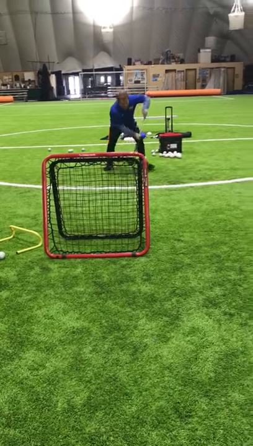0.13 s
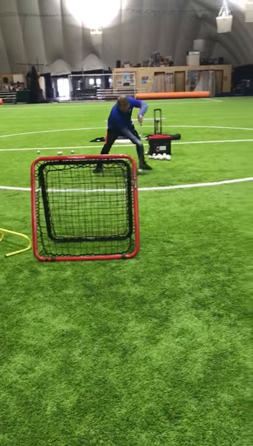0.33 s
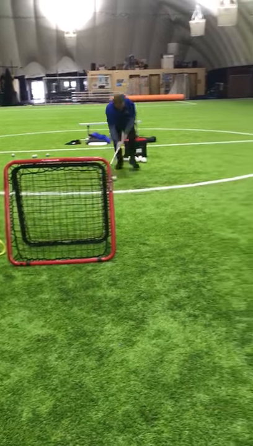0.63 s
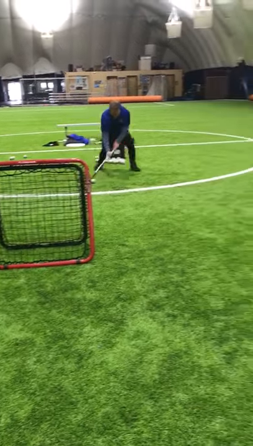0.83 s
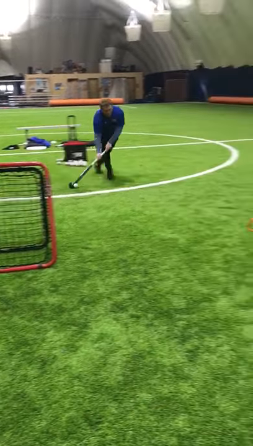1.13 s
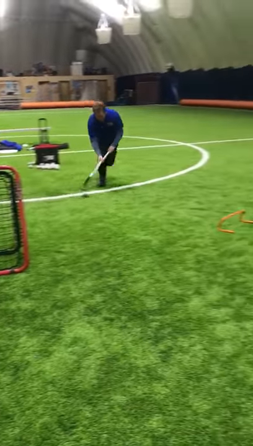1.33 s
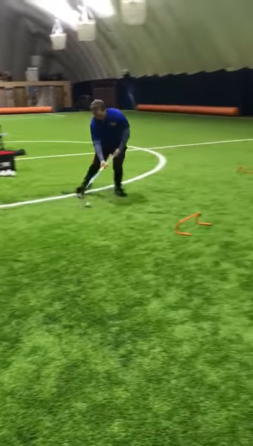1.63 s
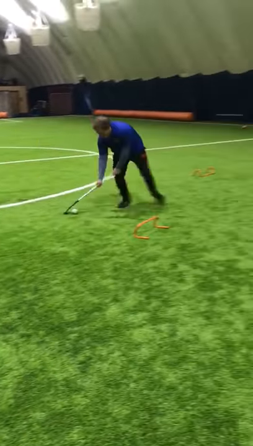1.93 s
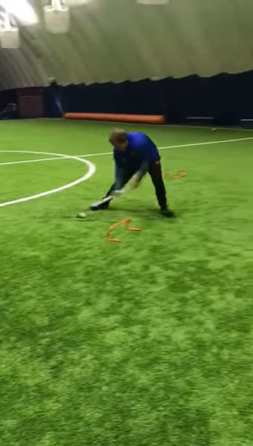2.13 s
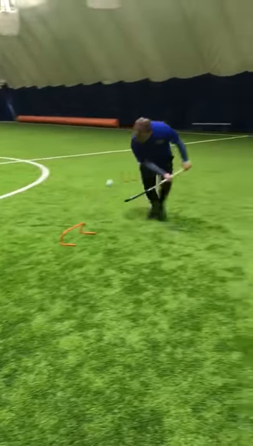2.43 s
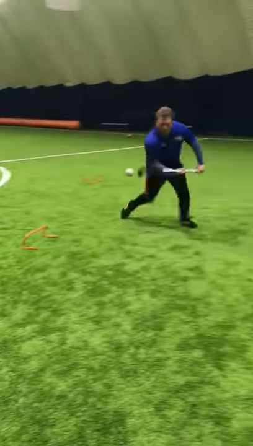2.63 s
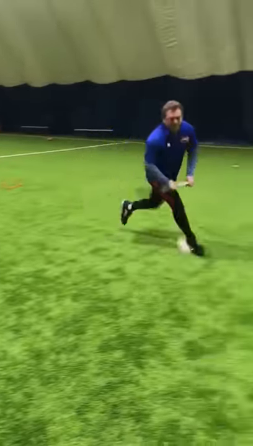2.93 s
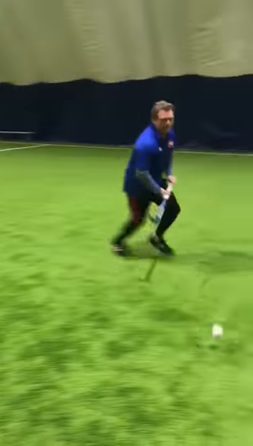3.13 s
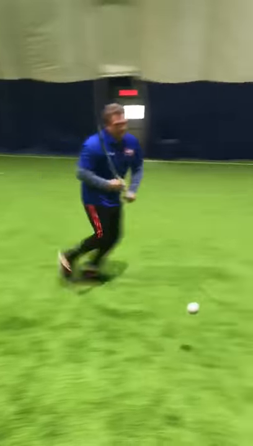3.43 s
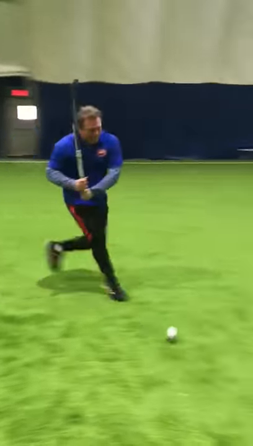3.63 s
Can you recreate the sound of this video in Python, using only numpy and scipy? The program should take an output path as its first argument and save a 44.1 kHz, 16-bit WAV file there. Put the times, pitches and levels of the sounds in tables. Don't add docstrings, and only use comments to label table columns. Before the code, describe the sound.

A stick strikes a hard ball with a bright, dry, woody crack at 0.4 s, followed by a quick slap and slow echo from a huge dome. A soft touch comes at 1.6, a dull one at 2.15, a firm tap at 2.33, faint touches near 3.1-3.2. A tiny metal jingle opens; close scuffs, swishes and ticks recur. Deep blower rumble continues, air hiss rising slightly at the end.

```python
import sys
import numpy as np
from scipy import signal
from scipy.io import wavfile

SR = 44100
rng = np.random.default_rng(int(sys.argv[2]) if len(sys.argv) > 2 else 0)


def unload_audio(sound):
    columns = np.transpose(np.atleast_2d(sound))
    steps = np.round(np.clip(columns, -1, 1) * 32767)
    wavfile.write(sys.argv[1], SR, steps.astype(np.int16))


def volts(x):
    e = np.asarray(x, float) / 20
    return 10 ** e


N = 166698


def rms_one(x):
    return x / np.sqrt(np.mean(x ** 2) + 1e-20)


def cut(x, hz, kind):
    return signal.sosfilt(signal.butter(2, np.clip(hz, 10, .45 * SR), kind, fs=SR, output="sos"), x)


def ring(hz, t60, size):
    t = np.arange(size) / SR
    return np.sin(2 * np.pi * hz * t) * volts(-60 * t / t60)


def burst(t60, size):
    return rng.standard_normal(size) * volts(-60 * np.arange(size) / SR / t60)


def add(out, s, x):
    i = int(s * SR)
    out[i:i + len(x)] += x[:len(out) - i]


def drift(rate):
    r = np.exp(-80 * np.pi * rate / SR)
    slow = signal.lfilter([1], [1, -2 * r, r * r], rng.standard_normal(N // 40 + 2002))[2000:]
    return np.interp(np.arange(N) / 40, np.arange(len(slow)), rms_one(slow))


def air(spectrum, patchy_db):
    hz, db = np.transpose(spectrum)
    edges = 22 * 2 ** np.arange(0, 9.4, 1 / 3)
    edges = edges[(edges > .7 * hz[0]) & (edges < 1.5 * hz[-1])]
    white, out = rng.standard_normal((2, N + SR)), 0
    for k, (low, high) in enumerate(zip(edges, edges[1:])):
        sos = signal.butter(2, [low, high], "band", fs=SR, output="sos")
        band = signal.sosfilt(sos, white[k % 2])[SR:]
        band_db = np.interp(np.log(low * high) / 2, np.log(hz), db)
        out = out + band * volts(band_db + patchy_db * drift(11.5))
    return rms_one(out)


def knocks():
    # start_s, crack_db, modes_db, low_ring_db, high_ring_db
    hits = [
        (0.40640, -8.5, -16.5, -19, -20.5),
        (1.6324, -33, -41, -33, -37.5),
        (2.160, -38.5, -39.5, -39, -52),
        (2.33275, -22, -24, -24, -33),
        (3.11, -38, -37.5, -50, -57),
        (3.2105, -50, -54, -39, -68),
    ]
    # low_ring_hz, low_ring_length_factor, modes_pitch_factor, length_factor, sent_db
    grips = [(855, 0.6, 1.0, .9, -1.5), (835, 1.4, 1.9, .7, -2.5), (720, 0.68, 1.6, .9, 2),
             (870, 0.9, 1.082, .6, -7), (910, 0.83, 1.09, .7, -5), (530, .9, 1.001, .9, -8)]
    # pitch_hz, level_db, t60_s
    stick_modes = [(1127, -14.5, 0.047), (1790, -3.5, 0.0088), (2050, -2.5, 0.0059), (2330, -15, 0.028),
                   (2680, -16.5, 0.03), (3145, -11, 0.027), (3400, -9.5, 0.0094), (4060, -15.5, 0.015),
                   (4500, -47, 0.0042), (5060, -20, 0.01), (5820, -18, 0.016), (5700, -7, 0.0049),
                   (9300, -14, 0.0033), (10500, -42, 0.0024)]
    size = 3000
    t = np.arange(size) / SR
    ring_lag_s, low_t60_s = .0008, .02
    high_hz, high_t60_s = 1378, .04
    out, sent = np.zeros(N), np.zeros(N)
    for hit, grip in zip(hits, grips):
        s, crack_db, modes_db, low_db, high_db = hit
        low_hz, longer, pitch, lasting, sent_db = grip

        snap = ring(7000, .0005, size) * np.minimum(t / .00011, 1) ** 2
        rattle = cut(cut(burst(.013, size), 980, "high"), 11000, "low")
        crack = volts(crack_db) * (volts(-20) * rattle + volts(10.5) * snap)
        modes = 0
        for k, (hz, db, t60) in enumerate(stick_modes):
            modes = modes + (-1) ** k * volts(db) * ring(hz * pitch, t60 * lasting, size)
        modes = volts(modes_db) * modes * np.minimum(t / .00025, 1)
        add(out, s, crack + modes)

        low = volts(low_db) * cut(ring(low_hz, low_t60_s * longer, size), 5400, "low")
        high = volts(high_db) * cut(ring(high_hz, high_t60_s * lasting, size), 1620, "low")
        thud = volts(modes_db - 10) * ring(366, .016, size)
        add(out, s + ring_lag_s, -low - high - thud)

        low = volts(low_db + 6) * ring(low_hz, low_t60_s * longer * 1.7, size)
        high = volts(high_db + .3) * ring(high_hz, .025, size)
        mid = volts(high_db - 1) * ring(1190, .03, size)
        slap = volts(low_db + 4) * cut(cut(burst(.008, size), 905, "high"), 1300, "low")
        add(sent, s, volts(sent_db) * (crack + volts(-4) * modes + high + mid + low + slap))
    return out, sent


def dome(x):
    # delay_s, rise_s, t60_s, level_db, high_cut_hz
    echoes = [
        (.051, 0.00053, 0.058, -33.5, 9300),
        (0.0506, 0.0054, 0.15, -33.5, 1550),
        (0.118, 0.024, 0.24, -40.5, 2500),
        (.18, 0.098, 1.3, -49.5, 1980),
        (.27, 0.018, .5, -52, 3000),
        (.40, .04, .9, -53.5, 2000),
    ]
    t, response = np.arange(2 * SR) / SR, 0
    for delay, rise, t60, db, high_hz in echoes:
        late = np.maximum(t - delay, 0)
        lumps_db = .53 * drift(44)[:2 * SR]
        swell = (1 - np.exp(-late / rise)) * volts(db - 60 * late / t60 + lumps_db)
        response = response + cut(cut(rng.standard_normal(2 * SR), high_hz, "low"), 656, "high") * swell
    return signal.fftconvolve(x, response)[:N]


def ticks():
    # start_s, peak_db, low_cut_hz, high_cut_hz
    clicks = [(.417, -45, 4500, 9000), (0.4207, -57, 2500, 6000), (0.4345, -36, 450, 12000),
              (0.436, -39, 400, 1400), (0.444, -52, 4260, 11330), (0.531, -48, 1900, 4230),
              (0.619, -48, 2370, 5670), (.898, -51, 3970, 7870), (1.641, -41.5, 3080, 8000),
              (1.6509, -42.5, 1950, 11200), (1.7507, -43, 2140, 3600), (2.17, -44.5, 2070, 7950),
              (2.178, -43, 2000, 8200), (2.213, -43, 590, 2500), (2.3487, -37, 1100, 2600),
              (2.512, -52, 3500, 7900), (2.823, -49, 3640, 10800), (2.841, -54, 3450, 10000),
              (3.004, -57, 2040, 6000), (3.112, -46.5, 5960, 11900), (3.469, -43.5, 1500, 4060),
              (3.494, -64, 2500, 5970), (3.704, -38.5, 3500, 11900), (3.745, -39.5, 1300, 4000)]
    out = np.zeros(N)
    for s, db, low_hz, high_hz in clicks:
        push = .3 * burst(.004, size=500) + (np.arange(500) == 0)
        click = cut(cut(cut(push, low_hz, "high"), high_hz, "low"), high_hz, "low")
        add(out, s, volts(db) * click / np.abs(click).max())
    return out


def scuffs():
    # middle_s, half_width_s, level_db, low_cut_hz
    shoe_strokes = [(.01, 0.03, -58, 1960), (0.039, 0.0068, -55, 2340), (.095, 0.02, -65.5, 2500),
                    (.58, 0.037, -72, 4970), (0.678, 0.039, -65.5, 3840), (1.319, 0.054, -72, 4900),
                    (1.755, 0.037, -66, 3700), (2.175, 0.026, -68.5, 3000), (2.31, 0.049, -60.5, 3760),
                    (2.38, 0.024, -68.5, 4000), (2.475, 0.036, -64.5, 4500), (2.553, 0.0054, -57, 2850),
                    (2.75, 0.016, -66.5, 4500), (2.83, 0.017, -69.5, 3820), (3.211, 0.0036, -60, 5000),
                    (3.47, 0.037, -82, 3000), (3.60, 0.0062, -71, 4000), (3.705, 0.0055, -64, 4000),
                    (3.75, 0.016, -66.5, 2500)]
    # middle_s, half_width_s, level_db, centre_hz
    swishes = [(0.03, 0.029, -55.5, 1290), (0.036, 0.017, -59, 4270), (2.345, 0.012, -46.5, 860),
               (2.23, 0.01, -55, 1370), (1.9, 0.065, -59.5, 850), (2.40, .012, -61, 990),
               (2.75, 0.035, -62, 1450), (2.83, 0.03, -62, 1400), (2.74, 0.035, -65, 2600),
               (2.90, 0.045, -65.5, 1500), (3.682, 0.52, -64, 1780)]
    t = np.arange(N) / SR
    grain = rms_one(cut(rng.standard_normal(N) * volts(1.5 * drift(68)), 9200, "low"))
    out = np.zeros(N)
    for s, half, db, hz in shoe_strokes:
        out += volts(db) * np.exp(-.5 * ((t - s) / half) ** 2) * cut(grain, hz, "high")
    for s, half, db, hz in swishes:
        band = cut(cut(grain, hz, "high"), hz, "low")
        hiss = rms_one(signal.lfilter(*signal.iirpeak(hz, 1 / .3, SR), band))
        out += volts(db) * np.exp(-.5 * ((t - s) / half) ** 2) * hiss
    return out


def jingles():
    # start_s, level_db, pitch_hz, t60_s
    small_rings = [(.006, -52, 3000, 0.036), (.008, -62, 11200, .03), (.023, -54, 4300, .04),
                   (.030, -71, 8350, .03), (.031, -53, 3060, .03), (.035, -45, 5380, 0.041),
                   (.039, -56, 4700, 0.022), (.038, -53, 3400, .04), (.052, -63, 10800, .03),
                   (.057, -66, 9490, .025), (.078, -63, 11200, .025), (.098, -57, 5400, 0.024),
                   (.097, -68, 10800, .025), (.100, -60, 3140, .025), (.101, -66, 9490, .025),
                   (.119, -65, 11000, .02), (.125, -61, 9490, .03), (.143, -62, 10700, .025),
                   (.147, -60, 9500, .03), (.164, -74, 10750, .03), (.170, -67, 9490, .025),
                   (.188, -71, 10900, 0.027), (.236, -71, 10700, 0.021), (.239, -67, 9480, 0.022),
                   (.260, -69, 9400, .02)]
    out = np.zeros(N)
    for s, db, hz, t60 in small_rings:
        add(out, s, volts(db) * ring(hz, t60, size=1500) * np.minimum(np.arange(1500) / 100, 1))
    return out


def air_rush():
    # pitch_hz, level_db_per_hz
    duct = [(350, -18), (550, -1), (1030, -4), (1450, -10), (2500, -15.5), (5000, -24.5), (8000, -30),
            (12400, -32.5)]
    # time_s, level_db
    facing = [
        (0, -62.5),
        (.4, -63),
        (1.3, -63),
        (2.1, -62.5),
        (2.6, -61.5),
        (3.3, -61.5),
        (3.78, -58.5),
    ]
    s, db = np.transpose(facing)
    return volts(np.interp(np.arange(N) / SR, s, db) + 2.5) * air(duct, patchy_db=2.0)


def blowers():
    # pitch_hz, level_db_per_hz
    fan = [(24, -54), (36, -4.5), (55, 1.5), (90, -7), (130, -10), (250, -22.5), (334, -29.5), (700, -43.5)]
    return volts(-37.5) * cut(air(fan, patchy_db=.97), 23.8, "high")


def scene():
    hits, sent = knocks()
    small = ticks()
    echo = dome(sent + volts(-8) * small)
    mix = hits + echo + small + scuffs() + jingles() + air_rush() + blowers()
    return mix[None]


def band_limit(x):
    return signal.sosfilt(signal.butter(12, 12670, fs=SR, output="sos"), x)


def record(dry):
    top_cut = signal.cheby2(10, 50, 13000, fs=SR, output="sos")
    mix = signal.sosfilt(top_cut, dry)
    return band_limit(mix)


dry = scene()
out = record(dry)
unload_audio(out)
```